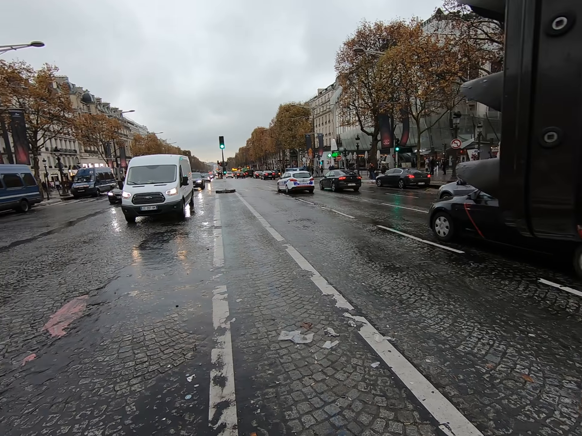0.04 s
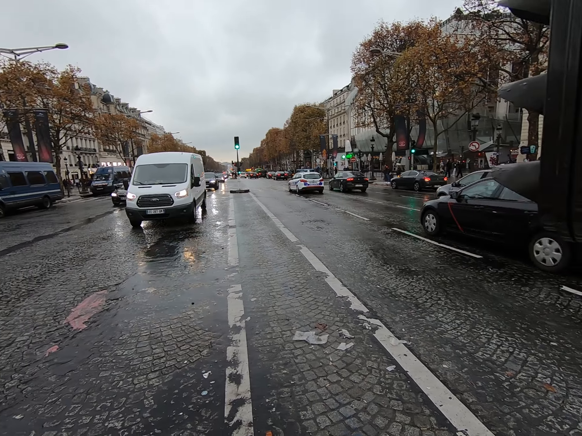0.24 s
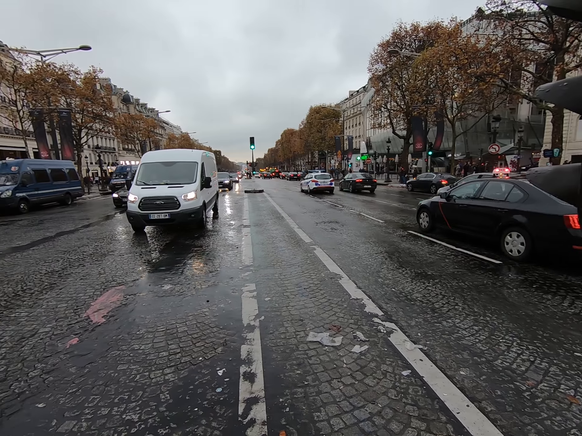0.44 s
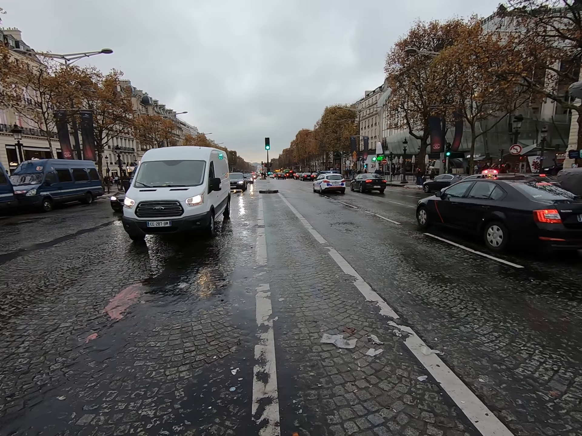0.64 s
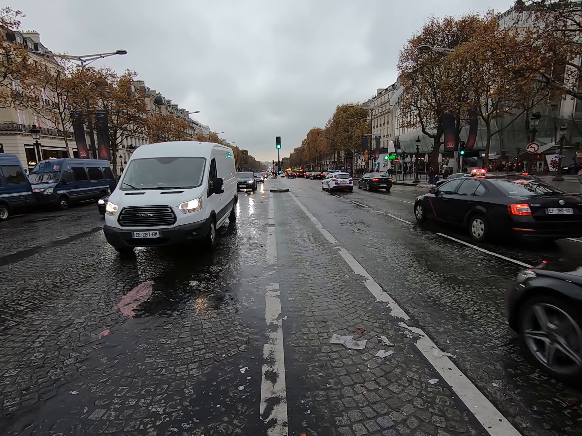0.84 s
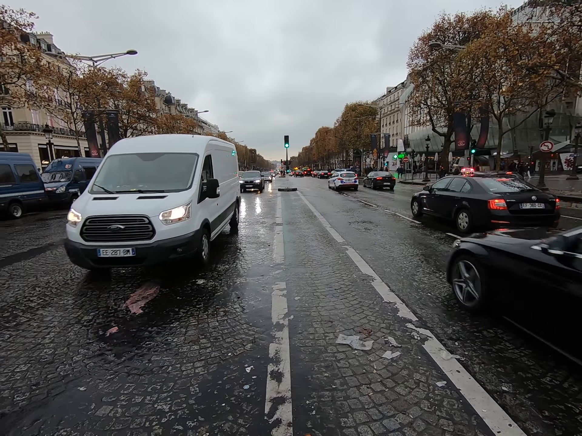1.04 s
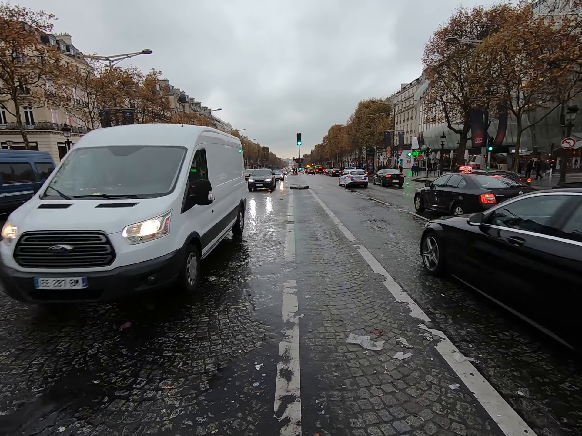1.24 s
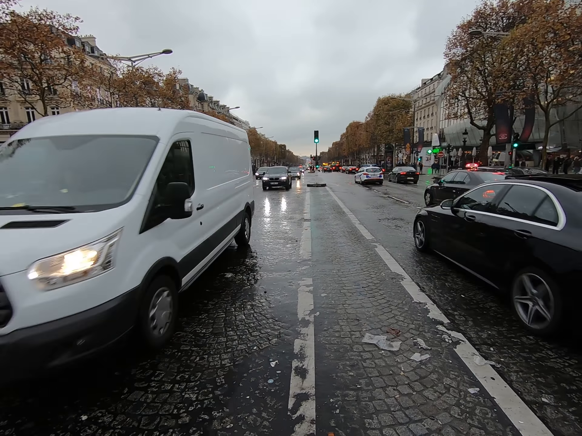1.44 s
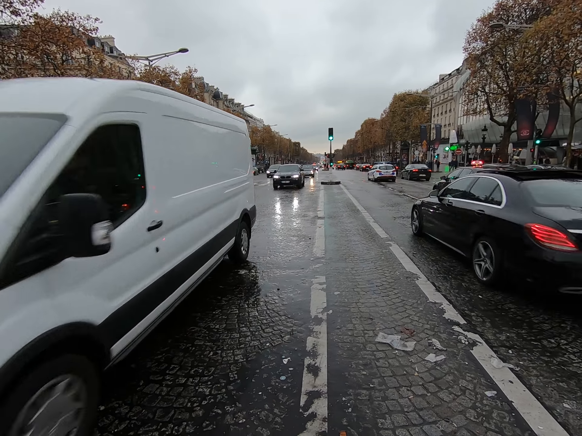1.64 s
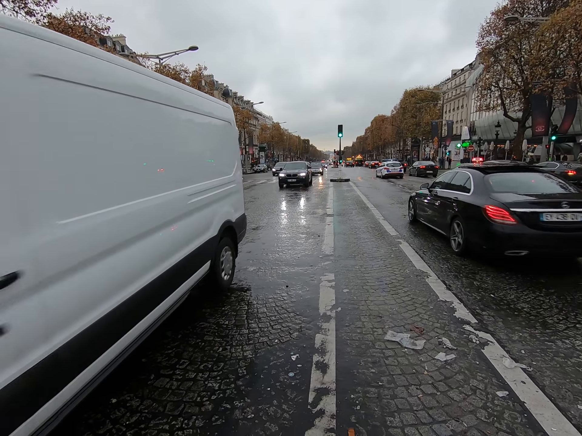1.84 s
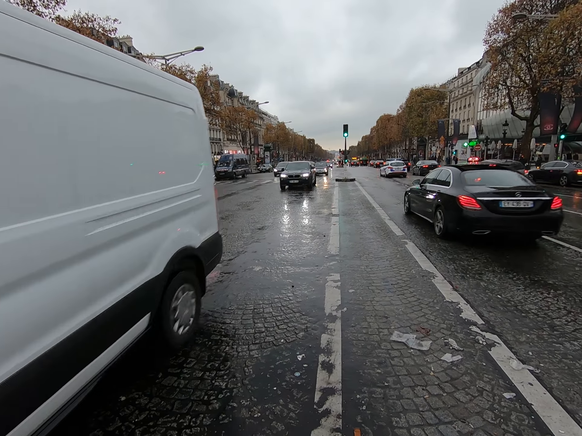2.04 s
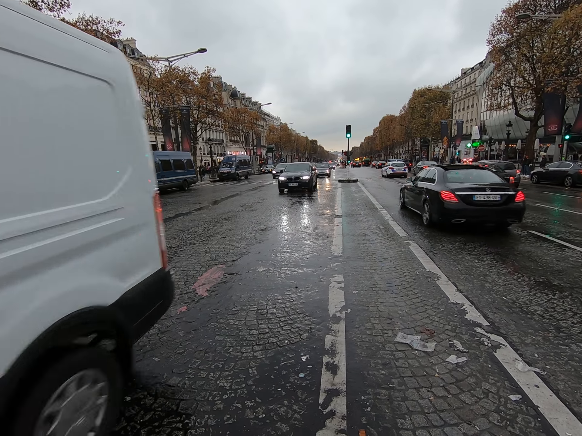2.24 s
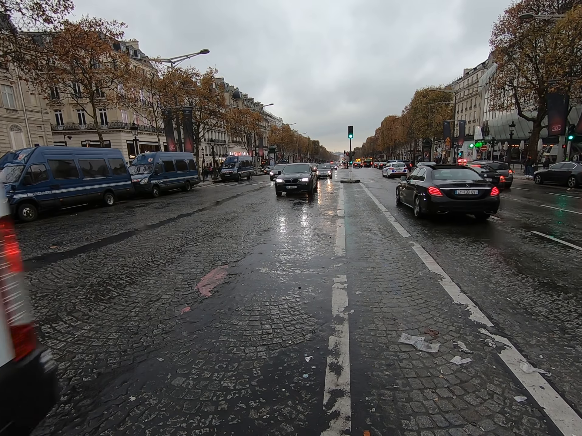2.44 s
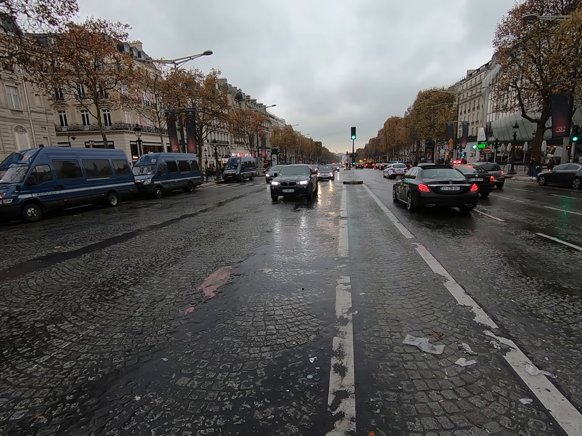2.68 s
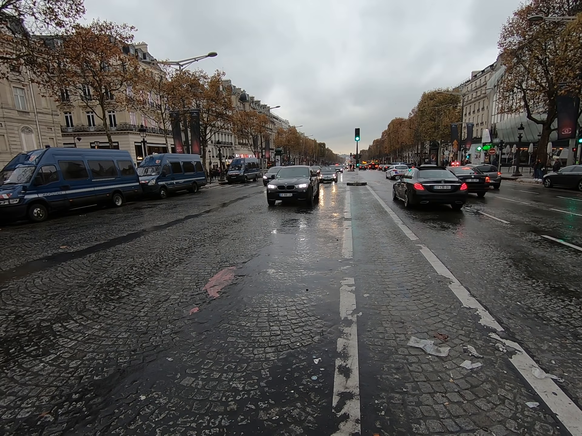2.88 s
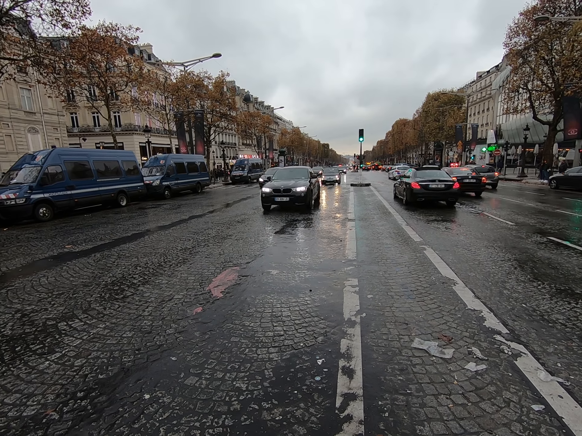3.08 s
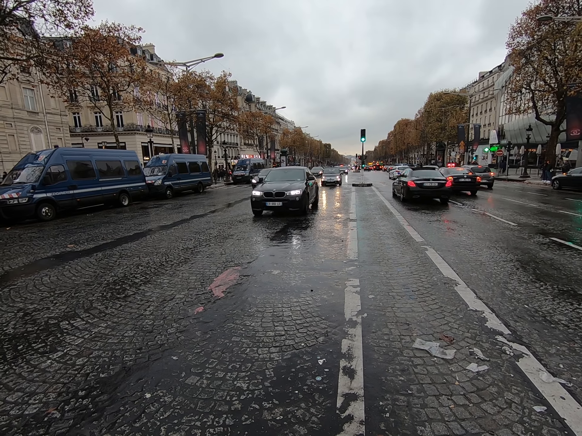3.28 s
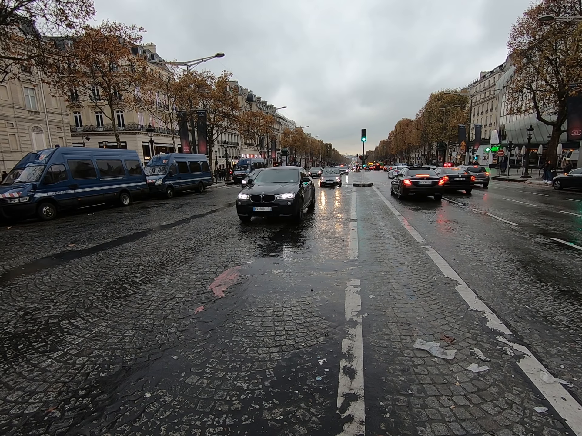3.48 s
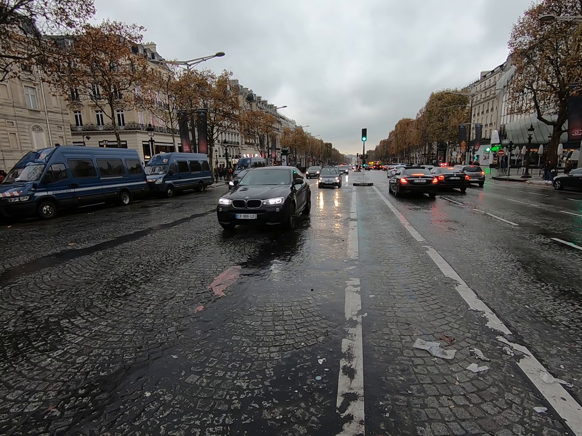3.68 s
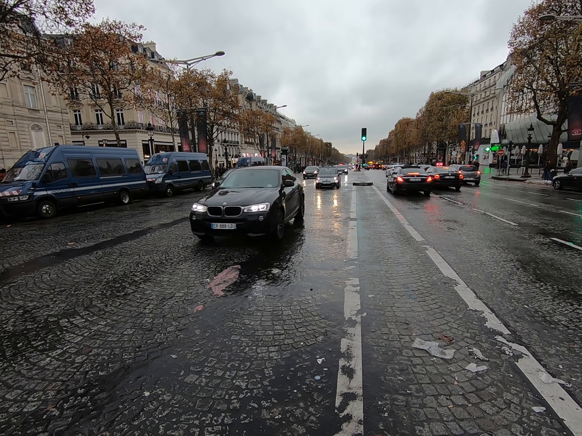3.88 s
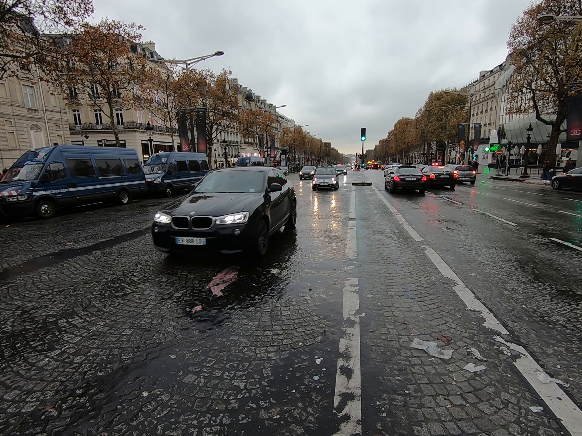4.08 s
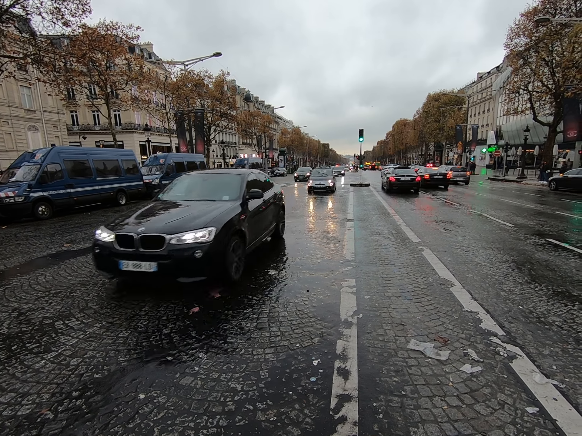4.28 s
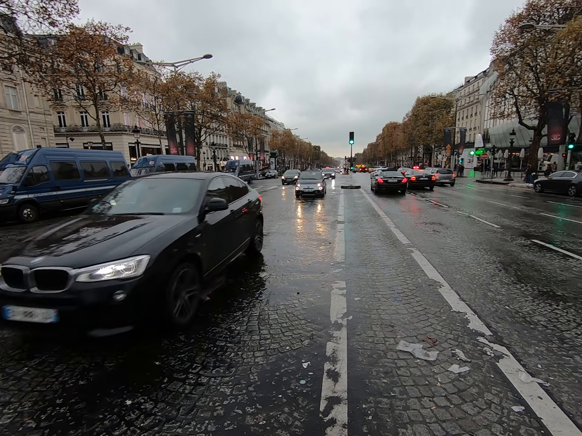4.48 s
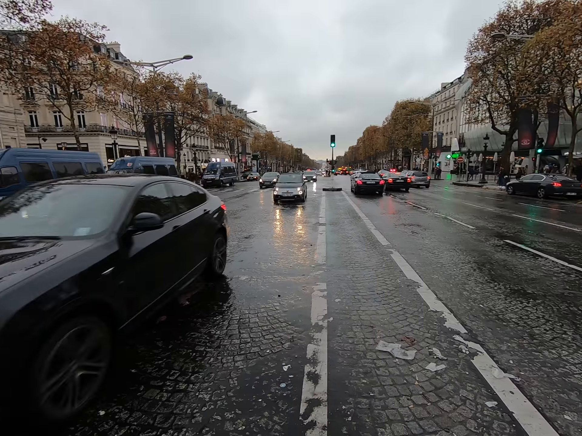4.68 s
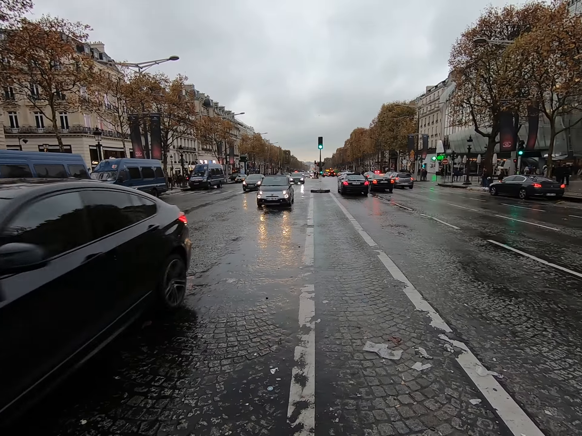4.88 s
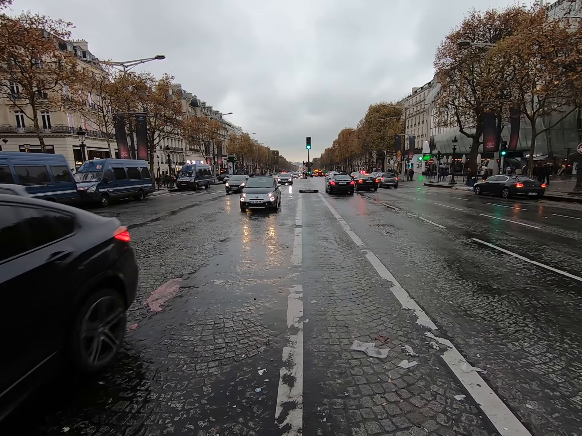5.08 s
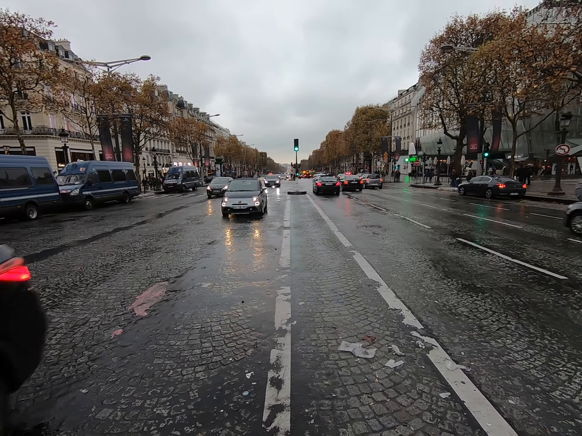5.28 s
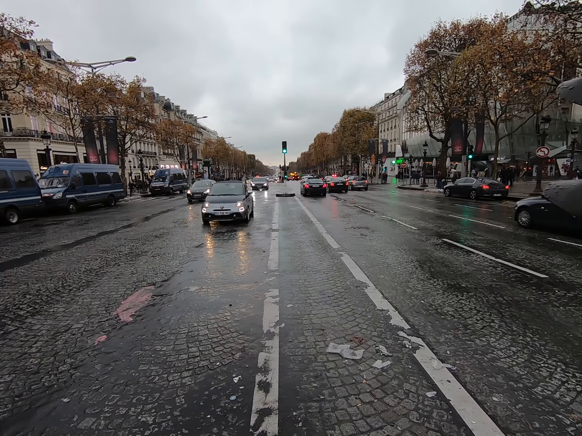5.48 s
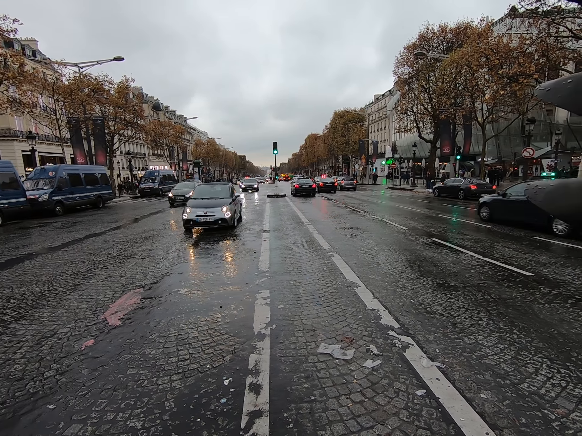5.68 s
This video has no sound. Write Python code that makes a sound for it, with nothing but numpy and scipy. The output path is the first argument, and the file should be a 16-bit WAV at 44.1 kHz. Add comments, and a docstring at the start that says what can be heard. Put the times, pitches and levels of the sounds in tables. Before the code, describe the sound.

A diesel van and then a large car pass close on wet cobbles, with deep rumble, drumming tyres and hissing spray.

```python
"""Traffic on a wet cobbled avenue

From the middle of the road: a diesel van passes close to the microphone, then a large car, each
drone sinking as it goes by. Tyres drum on the setts, roar in their tread and throw up hissing spray.
A wheel knocks on a stone now and then, the van's cargo box booms and a brake whines further off.
The recorder's limiter holds down the heavy bass."""
import sys
import numpy as np
from scipy import signal
from scipy.fft import rfft, irfft, next_fast_len
from scipy.io import wavfile
from scipy.ndimage import uniform_filter1d, minimum_filter1d, map_coordinates

SR = 44100
rng = np.random.default_rng(int(sys.argv[2]) if len(sys.argv) > 2 else 0)


def output_pcm(signal):
    """Save a mono or channel-first signal as 16-bit PCM at the path in sys.argv[1].

    Samples are clipped to [-1, 1] before scaling.
    """
    pcm = np.clip(np.atleast_2d(signal).T, -1, 1) * 32767
    wavfile.write(sys.argv[1], SR, np.round(pcm).astype(np.int16))


N = 252604


def amp(db):
    """Decibels to gain."""
    return 10 ** (np.asarray(db) / 20)


def unit(x):
    """x scaled to rms 1."""
    return x / np.sqrt(np.mean(x ** 2) + 1e-20)


def since(s):
    """Seconds after s, for each sample."""
    return np.arange(N) / SR - s


def swell(s, half_length):
    """A bell of height 1 around time s."""
    return np.exp(-(since(s) / half_length) ** 2)


def passing(s, approach, leave):
    """Level in dB of a source going by: 0 at time s, falling with distance on either side."""
    t = since(s)
    return -10 * np.log10(1 + (t / np.where(t < 0, approach, leave)) ** 2)


def curves(rows):
    """One value per sample for each column after the time."""
    s, *cols = np.transpose(rows)
    return [np.interp(np.arange(N) / SR, s, c) for c in cols]


def wobble(rate):
    """A smooth random curve, rate knots a second."""
    return map_coordinates(rng.standard_normal(int(N * rate / SR) + 4), [np.arange(N) * rate / SR])


def filtered(x, response):
    """x through a frequency response."""
    m = next_fast_len(N + SR // 2)
    return irfft(rfft(x, m) * response(np.fft.rfftfreq(m, 1 / SR)), m)[:N]


def coloured(x, spectrum):
    """x shaped by (Hz, dB) points, at rms 1."""
    f, db = np.transpose(spectrum)
    return unit(filtered(x, lambda hz: amp(np.interp(np.log(hz + 1), np.log(f), db))))


def impacts(rate, spread_db):
    """Random tiny blows of uneven size, rate a second, at rms 1."""
    at = np.flatnonzero(rng.random(N) < rate / SR)
    size, side = rng.standard_normal(N)[at], rng.random(N)[at]
    return unit(np.bincount(at, np.sign(side - .5) * amp(spread_db * np.clip(size, -2.5, 2.5)), N))


def patchy(depth_db):
    """Noise whose colour shifts in random patches as the road surface changes."""
    bins = signal.stft(rng.standard_normal(N), nperseg=1024)[2]
    field = uniform_filter1d(rng.standard_normal(bins.shape), size=4, axis=0)
    field = uniform_filter1d(field, size=10, axis=1)
    return unit(signal.istft(bins * amp(depth_db * unit(field)), nperseg=1024)[1][:N])


def traffic(far_roar_db, far_swish_db, far_spray_db):
    """Levels in dB of roar, swish and spray at the microphone: passing tyres over the far traffic."""
    # Next lane, van front, van rear, large car head on, then alongside, the car behind it.
    # Each row: loudest moment, approach and leave in seconds, then roar, swish and spray in dB.
    passes = [(.27, 0.28, 0.73, -40.5, -55.5, -49), (1.799, 0.83, 0.16, -43, -44, -44),
              (2.32, 0.45, .1, -46, -50.5, -55.5), (3.76, 0.57, 0.27, -42, -45, -51.5),
              (4.42, 0.23, 0.71, -42, -46.5, -63), (5.6, 0.93, 0.97, -39, -50, -61)]
    power = amp([[far_roar_db], [far_swish_db], [far_spray_db]]) ** 2
    for s, approach, leave, *levels in passes:
        power = power + amp(np.array(levels)[:, None] + passing(s, approach, leave)) ** 2
    return 10 * np.log10(power)


def cobbles(body_db=-23, even_setts_db=-49.5):
    """Countless blows on the setts shake the car bodies, drum in the tyres and slap the tread."""
    # Spectra of body, tyre carcass and slap. Each row: frequency in Hz, relative level in dB.
    body_spectrum = [(12, -32.5), (24, -6.5), (31, -11), (40, -1), (65, -3), (80, -0.5), (100, -1.5),
                     (130, -5), (165, -13), (220, -21), (400, -86)]
    carcass_spectrum = [(70, -43), (120, -6.5), (155, -2.5), (210, -4), (245, -12.5), (300, -20.5),
                        (380, -39.5), (700, -79.5)]
    slap_spectrum = [(150, -34.5), (290, -6.5), (360, 0), (440, 0.5), (560, -0.5), (700, -4), (1100, -19.5),
                     (3000, -58.5)]
    # Drumming in the carcasses. Each row: time in seconds, level in dB.
    drumming = [(0, -25.5), (.35, -27), (1.47, -28), (1.6, -30), (2.7, -32.5), (3.75, -27.5), (4.35, -37),
                (4.8, -27.5), (5.73, -27)]
    # A wheel clatters over uneven setts. Each row: time and half length in seconds, level in dB.
    patches = [(0.574, 0.11, -41.5), (0.995, 0.22, -43.5), (3.1, 0.078, -43.5), (3.828, 0.38, -46.5),
               (4.824, 0.072, -48), (5.694, 0.25, -40.5)]
    # A near vehicle screens the other lanes. Each row: time and half length in seconds, loss in dB.
    shadows = [(2.1, 0.21, 1), (4.52, 0.087, 4), (5.08, 0.11, 4)]
    carcass_db, = curves(drumming)
    shaken_db = body_db + .15 * (carcass_db - carcass_db.mean()) + 1.2 * wobble(9.9)
    body = amp(shaken_db) * coloured(impacts(rate=1500, spread_db=4), body_spectrum)
    carcass = amp(carcass_db) * coloured(impacts(rate=900, spread_db=3), carcass_spectrum)
    slap_power = amp(even_setts_db) ** 2 + sum(amp(db) ** 2 * swell(s, half) for s, half, db in patches)
    shadow_db = sum(loss_db * swell(s, half) for s, half, loss_db in shadows)
    slap = coloured(impacts(rate=600, spread_db=0.5), slap_spectrum)
    return body + carcass + np.sqrt(slap_power) * amp(-shadow_db) * slap


def tread(roar_db, relative_hum_db=-7.5):
    """Air pumped from the grooves roars between tyre and road; the tread blocks hum in snatches."""
    # Spectra before the glide. Each row: frequency in Hz, relative level in dB.
    roar_spectrum = [(300, -29), (440, -17.5), (530, -8.5), (640, -1), (840, -1), (960, 0), (1120, -8),
                     (1400, -14.5), (2200, -35.5), (5000, -71.5)]
    hum_spectrum = [(520, -51.5), (640, -19.5), (780, -8), (860, 0.5), (930, -8), (1020, -23.5),
                    (1250, -60.5)]
    # Pitch follows the nearest tyres' speed. Each row: time in seconds, Hz (used against its mean).
    pitch = [(0, 772.7), (1.4, 800.6), (1.8, 866.7), (2.3, 876.2), (2.75, 800.1), (3.8, 817), (4.7, 838.6),
             (5.73, 920.3)]
    # A near tyre sings out. Each row: time and half length in seconds, rise of the hum in dB.
    snatches = [(0.244, 0.085, 10), (3.818, 0.072, 9), (4.478, 0.24, 4.5)]
    hz, = curves(pitch)
    glide = uniform_filter1d(hz, size=SR // 4) * (1 + 0.01194 * wobble(7))
    position = np.cumsum((glide / glide.mean()) ** .9)
    rolling = lambda x: unit(map_coordinates(x, [position], mode="mirror"))
    roar = rolling(coloured(patchy(depth_db=1.5) + .5 * impacts(rate=490, spread_db=2), roar_spectrum))
    hum = rolling(amp(1.3 * wobble(18)) * coloured(rng.standard_normal(N), hum_spectrum))
    sung_db = sum(rise_db * swell(s, half) for s, half, rise_db in snatches)
    return amp(roar_db) * (roar + amp(relative_hum_db + sung_db) * hum)


def water(swish_db, spray_db):
    """Water swishes from under the tyres and flies off as droplets; big ones tick on the stones."""
    # Spectra of film, droplets and big drops. Each row: frequency in Hz, relative level in dB.
    swish_spectrum = [(600, -24.5), (1100, -3.5), (1450, 5), (1750, -1.5), (2200, -3.5), (2800, -12.5),
                      (4000, -9), (7000, -35.5), (12000, -70.5)]
    spray_spectrum = [(1500, -15), (2600, -3.5), (3100, 2), (4000, -3.5), (5000, -4), (5900, -3),
                      (7000, -11), (8200, -17), (9800, -24.5), (11200, -44.5), (12400, -42.5), (15500, -59)]
    spatter_spectrum = [(2000, -22), (3500, -8.5), (5500, 7), (8000, -3.5), (10000, -19), (12500, -24.5),
                        (15500, -40.5)]
    film = patchy(depth_db=0.94) + 0.28 * impacts(rate=600, spread_db=8)
    swish = amp(swish_db) * coloured(film, swish_spectrum)
    droplets = patchy(depth_db=2) + 0.5 * impacts(rate=1400, spread_db=4)
    spray = amp(spray_db + 0.9 * wobble(35)) * coloured(droplets, spray_spectrum)
    spatter = amp(spray_db - 19) * coloured(impacts(rate=67, spread_db=5), spatter_spectrum)
    return swish + spray + spatter


def tyre_rings():
    """Rough stretches set a tyre ringing, low in its air cavity or high in its grooves."""
    # Each row: time and half length in seconds, centre and half width in Hz, level in dB.
    resonances = [(.25, 0.16, 109, 26, -21.5), (1.0, 0.19, 132, 24, -25), (1.427, 0.11, 115, 11, -30.5),
                  (3.802, 0.2, 1400, 120, -49), (4.268, .1, 1410, 56, -47), (4.998, 0.35, 102.6, 10, -28.5)]
    out = np.zeros(N)
    for s, half, centre_hz, width_hz, db in resonances:
        blows = impacts(rate=900, spread_db=3)
        ring = filtered(blows, lambda hz: np.exp(-((hz - centre_hz) / width_hz) ** 2 / 2))
        out += amp(db) * swell(s, half) * unit(ring)
    return out


def knocks(thud_gain_db=-8.5):
    """A wheel hits a stone or flicks grit: a sharp wet click and a short dull thud."""
    # Each row: start in seconds, relative levels of thud and click in dB, click centre in Hz.
    blows = [(.546, -29, -30, 681), (.572, -36, -29, 880), (1.498, -3.5, -27, 2800),
             (3.660, -49, -26.5, 4150), (4.448, -45, -24.5, 870)]
    # Modes of stone and wheel. Each row: frequency in Hz, relative level in dB, seconds to fall 60 dB.
    modes = [(269, -2, 0.057), (338, -3, 0.023), (463, -3.5, 0.017), (616, -11, 0.041)]
    # Each row: multiple of the click's centre, relative level in dB.
    click_spectrum = [(.2, -26), (.6, -1.5), (.85, 14.5), (1.15, 7.5), (1.45, -10.5), (2, -25.5), (5, -48),
                      (12, -91)]
    out, t = np.zeros(N), np.arange(SR // 4) / SR
    thud = sum(amp(db - 60 * t / t60) * np.sin(2 * np.pi * hz * t) for hz, db, t60 in modes)
    thud *= 1 - np.exp(-t / 0.0008)
    for s, thud_db, click_db, click_hz in blows:
        noise = coloured(rng.standard_normal(N), [(click_hz * k, db) for k, db in click_spectrum])
        cycles = t * click_hz  # low clicks ring longer
        click = amp(-1.8 * cycles) * (1 - np.exp(-3 * cycles)) * noise[:len(t)]
        out[round(s * SR):][:len(t)] += amp(thud_db + thud_gain_db) * thud + amp(click_db) * click
    return out


def exhaust(hz, db, second_db, third_db, throb_db, drift):
    """Firing pulses, muffled to their lowest three harmonics and slightly uneven."""
    phase = 2 * np.pi * np.cumsum(hz * (1 + drift * wobble(9))) / SR
    tone = np.sin(phase) + amp(second_db) * np.sin(2 * phase) + amp(third_db) * np.sin(3 * phase)
    return unit(tone) * amp(db + throb_db * wobble(10))


def engines():
    """Van and car swell and sink in pitch as they pass; a third engine drones further off."""
    # Van, then car. Each row: loudest moment, approach and leave in seconds, level in dB.
    passes = [(1.9, 0.51, 0.39, -15), (4.72, 0.47, 0.48, -21.5)]
    # Firing rates as heard. Each row: time in seconds, rate in Hz.
    van_rate = [(0, 57.8), (.8, 58.95), (1.36, 58.86), (1.65, 55.3), (2.03, 54.75), (2.17, 52.6),
                (2.38, 50.98), (2.52, 48.14), (2.75, 44.54), (3.6, 43.18)]
    car_rate = [(3.2, 54.34), (4.7, 51.83), (5.3, 47.45), (5.73, 46.6)]
    # The far engine's short swells. Each row: time in seconds, pitch in Hz, level in dB.
    drone = [(2.7, 81.4, -40), (3.15, 84.55, -23), (3.4, 81.43, -48), (3.85, 75.8, -34.5),
             (4.15, 80.66, -19), (4.4, 79.3, -35), (4.8, 76.8, -61)]
    van_db, car_db = [db + passing(s, approach, leave) for s, approach, leave, db in passes]
    van_db -= 11.5 * swell(1.545, 0.1)  # the van's drone dips briefly
    van = exhaust(*curves(van_rate), van_db, second_db=-29.5, third_db=-29.5, throb_db=1.9, drift=0.0086)
    car = exhaust(*curves(car_rate), car_db, second_db=-19, third_db=-16.5, throb_db=3, drift=0.0276)
    far = exhaust(*curves(drone), second_db=-28.5, third_db=-27, throb_db=1.5, drift=0.017)
    return van + car + far


def plumes(beaming=1.24, screening_s=0.17, mist_db_per_s=7.5):
    """Spray flung right by the microphone swells, is screened by the vehicle's side and settles."""
    # Each row: time in seconds, level in dB, rise in seconds before beaming, screening loss in dB.
    wheels = [(1.86, -37.5, 0.52, 5.5), (2.4, -50, 0.15, 8), (4.85, -48, 0.18, -0.5)]
    # Close spray. Each row: frequency in Hz, relative level in dB.
    spectrum = [(2000, -26), (2900, -10), (3700, -0.5), (4900, 1), (5900, -4.5), (7000, -14.5),
                (8200, -27.5), (10000, -29.5), (11400, -44.5), (12500, -33.5), (15500, -47.5)]
    drops = patchy(depth_db=0.5) + 0.59 * impacts(rate=1700, spread_db=6.5)
    power = np.zeros(N)
    for s, db, rise, screen_db in wheels:
        after = np.maximum(since(s), 0)
        approach_db = beaming * passing(s, rise, np.inf)  # thrown forward, so it swells faster
        loss_db = screen_db * np.minimum(after / screening_s, 1) + mist_db_per_s * after
        power += amp(db + approach_db - loss_db) ** 2
    return np.sqrt(power) * amp(0.76 * wobble(45)) * coloured(drops, spectrum)


def cargo_boom():
    """Blows from the setts make the van's hollow cargo box boom."""
    # Each row: time in seconds, level in dB.
    levels = [(1.58, -39), (1.7, -16.5), (1.86, -27), (2.05, -29), (2.25, -19), (2.4, -21), (2.53, -14),
              (2.7, -69.5)]
    # The box's resonance. Each row: frequency in Hz, relative level in dB.
    spectrum = [(40, -42.5), (58, -16), (66, 14.5), (73, 17), (100, -28.5), (200, -87)]
    db, = curves(levels)
    return amp(db) * coloured(impacts(rate=1200, spread_db=-2.5), spectrum)


def hollowed(hiss, half_width_hz=480):
    """One band of the hiss fades as the van's side goes by, and again behind it."""
    # Each row: time and half length in seconds, centre in Hz, share lost from 0 to 1.
    hollows = [(2.029, 0.23, 3120, 0.48), (2.77, 0.27, 3020, 0.45)]
    band = lambda centre: filtered(hiss, lambda hz: np.exp(-((hz - centre) / half_width_hz) ** 2))
    return hiss - sum(share * swell(s, half) * band(centre) for s, half, centre, share in hollows)


def brake():
    """Further off, a pad sings unsteadily on its wet disc; street echoes smear its note."""
    # Each row: time in seconds, pitch in Hz, level in dB.
    whine = [(2.7, 1144, -57), (2.9, 1179, -49.5), (3.08, 1205, -44), (3.2, 1244, -52), (3.35, 1174, -73),
             (3.57, 1190, -46), (3.75, 1090, -79)]
    hz, db = curves(whine)
    phase = 2 * np.pi * np.cumsum(hz * (1 + 0.01183 * wobble(90))) / SR
    smeared = wobble(60) * np.sin(phase) + wobble(60) * np.cos(phase)
    return amp(db) * unit(smeared)


def scene():
    """The avenue from one microphone in the middle of the road."""
    roar_db, swish_db, spray_db = traffic(far_roar_db=-45, far_swish_db=-50.5, far_spray_db=-52)
    rolling = cobbles() + cargo_boom() + tyre_rings() + tread(roar_db)
    hiss = hollowed(water(swish_db, spray_db) + plumes())
    return (rolling + hiss + engines() + brake() + knocks())[None]


def limited(x, ceiling_db, hold_s):
    """The gain dips smoothly around every peak that would pass the ceiling."""
    span = max(int(hold_s * SR), 2)
    needed = np.minimum(1, amp(ceiling_db) / (np.abs(x) + 1e-9))
    return x * uniform_filter1d(minimum_filter1d(needed, span), span)


def record(dry):
    """The recorder limits only the bass and keeps nothing above its band limit."""
    crossover_hz, top_hz = 300, 15700
    sound = dry[0] * signal.windows.tukey(N, .002)
    bass = filtered(sound, lambda hz: 1 / (1 + (hz / crossover_hz) ** 6))
    held = limited(bass, ceiling_db=-9.6, hold_s=.02)
    return filtered(held + sound - bass, lambda hz: hz < top_hz)[None]


dry = scene()
out = record(dry)
output_pcm(out)
```